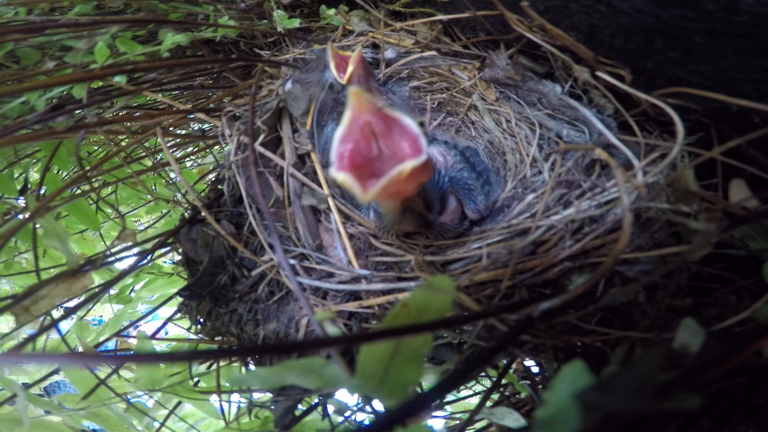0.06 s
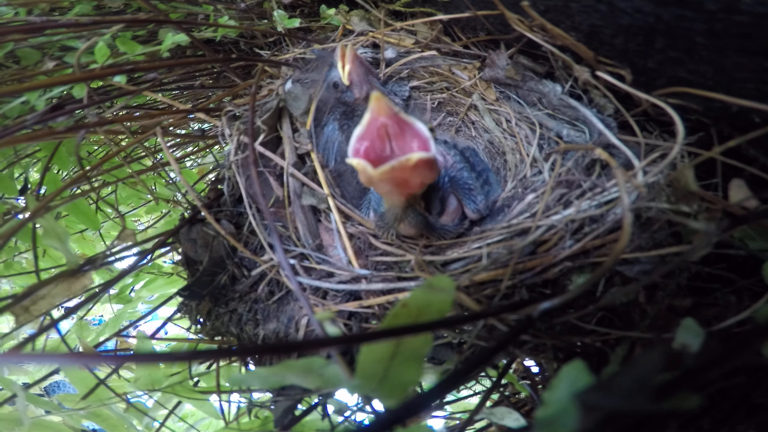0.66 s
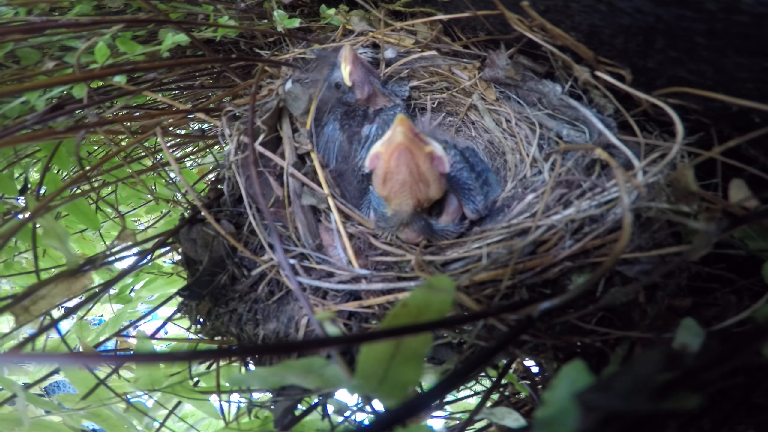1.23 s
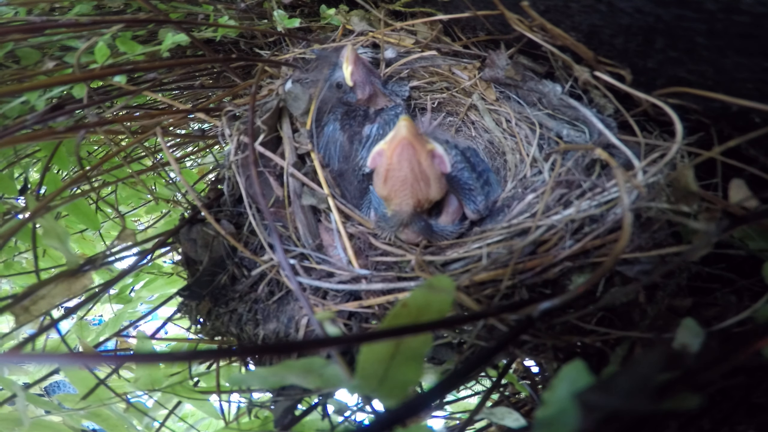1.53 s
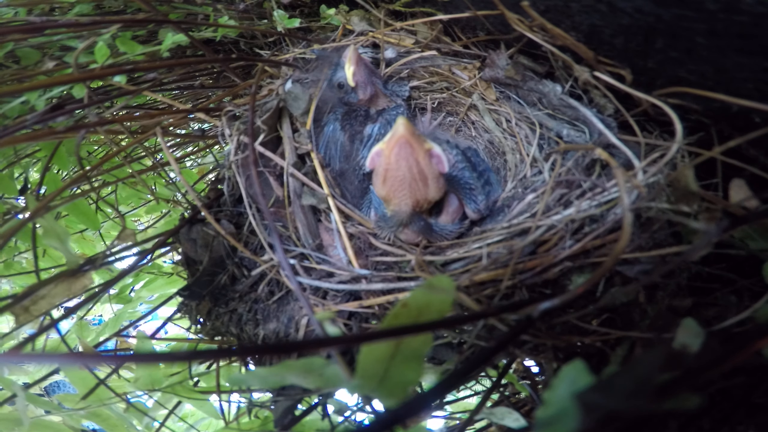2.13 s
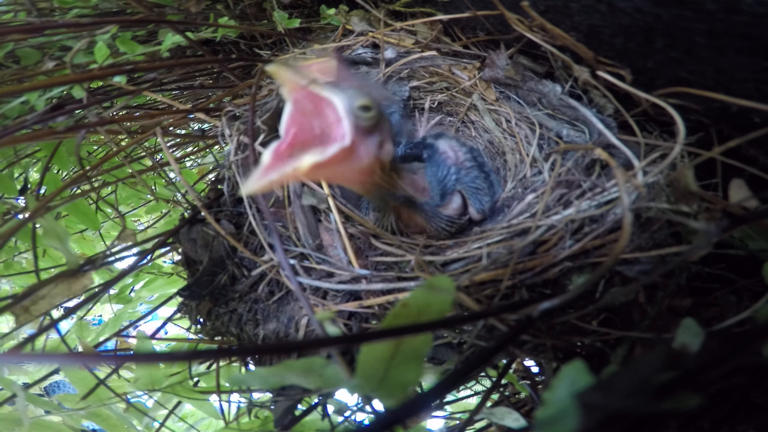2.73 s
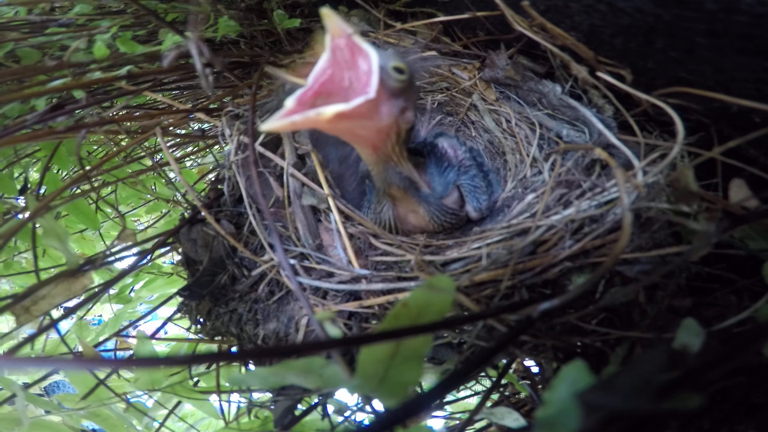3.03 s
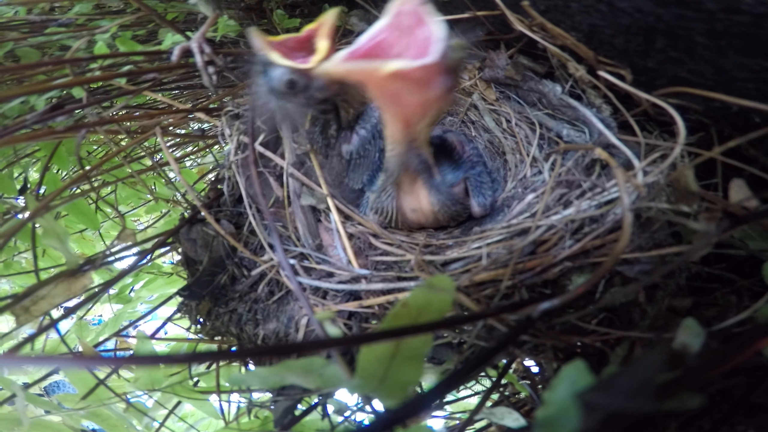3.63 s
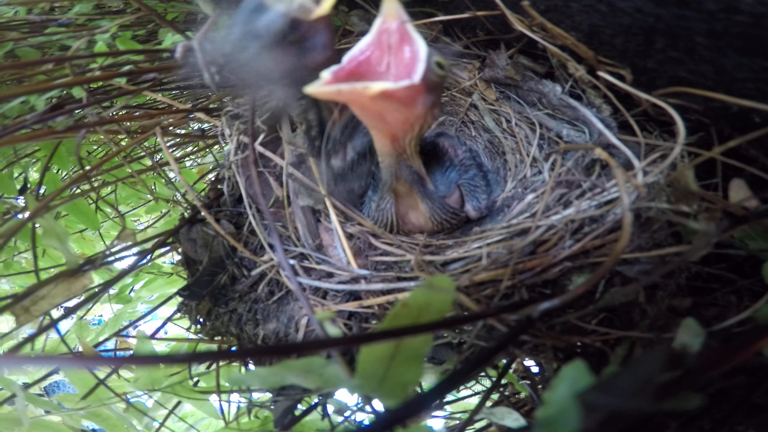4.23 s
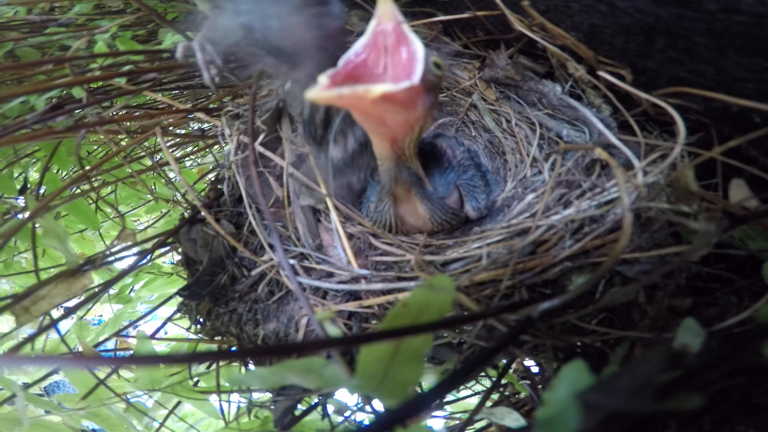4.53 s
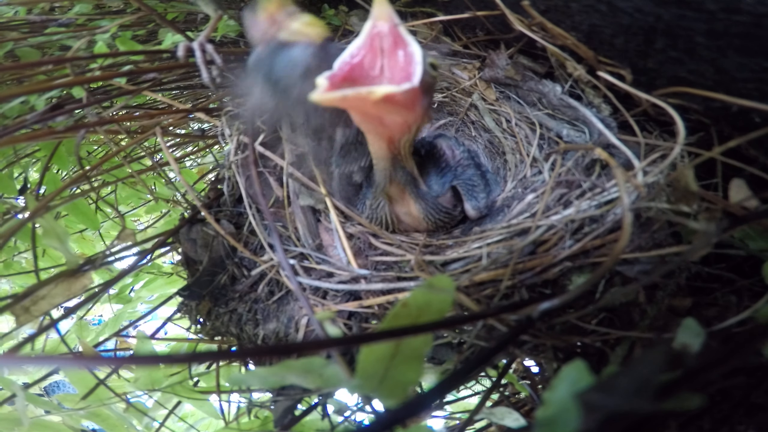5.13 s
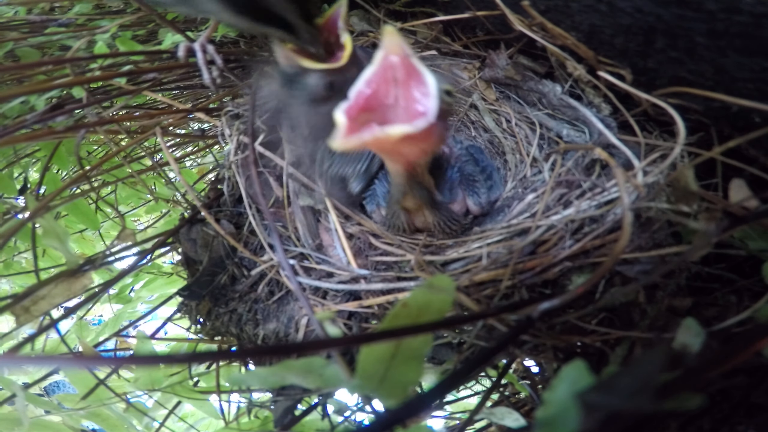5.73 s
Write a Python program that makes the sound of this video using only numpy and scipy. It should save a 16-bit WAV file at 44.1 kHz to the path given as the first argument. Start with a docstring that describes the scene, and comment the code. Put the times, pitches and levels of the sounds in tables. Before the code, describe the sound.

Nestling birds move in a garden nest, very close to the microphone. A short crackle of dry straw and twigs opens the sound and fades by 0.3 seconds. A second burst of rustling, snaps and soft bumps comes from about 1.5 to 2 seconds. The loudest crunching and knocking runs from 2.4 to 3.1 seconds. Each movement shakes the microphone with a low rumble. At about 2.8 seconds the chicks begin begging: around nine short, thin, wavering, very high peeps, two or three a second, continuing to about 6 seconds. They are much quieter than the snaps, growing a little clearer after 4.4 seconds, with faint rising trills between them. Light fidgeting and a few ticks and scrapes accompany the peeps, with one soft bump near 4.5 seconds. A faint hiss and a low electrical throb, about ten pulses a second, lie underneath throughout.

```python
"""Nestlings beg in a garden nest, close to a small camera fixed among the twigs.
Each peep is a self-sustained oscillation of the syrinx, a thin wavering whistle at 6-7 kHz, with faint
rising trills between. The chicks' lurches crush the dry lining, whose clicks and snaps excite resonances
of the twigs and camera housing, and sway the nest, which shakes the camera with a low rumble.
A faint electrical throb and hiss lie underneath."""
import sys
import numpy as np
from scipy import signal
from scipy.fft import rfft, irfft
from scipy.io import wavfile
from scipy.ndimage import uniform_filter1d

SR = 44100
rng = np.random.default_rng(int(sys.argv[2]) if len(sys.argv) > 2 else 0)


def file_out(sig):
    """Save sig as 16-bit WAV at sys.argv[1]."""
    # one column per channel
    cols = np.atleast_2d(sig).T
    # limit, then scale
    lim = np.clip(cols, -1, 1)
    pcm = np.round(lim * 32767).astype(np.int16)
    wavfile.write(sys.argv[1], SR, pcm)


N = 263277
TIME = np.arange(N) / SR
SLOW_TIME = TIME[::32]

# a chick shifts its weight (levels relative): start_s, length_s, rustle_db, sway_db
LURCHES = [(0, 0.015, -44.5, -42), (0.082, 0.045, -39.5, -26), (0.174, 0.028, -52, -39),
           (0.262, 0.056, -63, -35), (0.506, 0.017, -64, -36.5), (1.137, 0.017, -73, -38.5),
           (1.39, 0.24, -64, -37.5), (1.576, 0.041, -40, -26), (1.646, 0.018, -34, -24.5),
           (1.681, 0.047, -47.5, -27), (1.791, 0.039, -53, -36.5), (1.936, 0.011, -55.5, -37),
           (2.382, 0.054, -51, -37.5), (2.46, 0.026, -37, -41), (2.517, 0.068, -30.5, -23.5),
           (2.587, 0.048, -35, -25.5), (2.655, 0.027, -46, -29.5), (2.738, 0.011, -72, -27),
           (2.904, 0.066, -32.5, -28.5), (3.011, 0.044, -36.5, -32.5), (3.108, 0.091, -60.5, -35),
           (3.319, 0.043, -47.5, -31), (3.897, 0.018, -68, -33.5), (4.098, 0.18, -69.5, -39),
           (4.41, .03, -66, -36.5), (4.704, 0.033, -76, -37.5), (5.614, 0.042, -73, -35),
           (5.827, 0.09, -72, -39)]
# resonances of the twigs and camera housing: centre_hz, width_hz, gain_db
BODY_MODES = [(453, 330, 4.5), (898, 96, 3), (1250, 28, 4), (2020, 36, 1), (2382, 89, 4.5), (2743, 62, 1.5),
              (4000, 95, 4.5), (4450, 370, 3), (4730, 210, -0.5), (6800, 810, 9)]
# spectrum of rubbed straw: frequency_hz, gain_db
STRAW_SPECTRUM = [(80, -17), (160, 12), (300, -2.5), (700, -2.5), (1500, 1), (2600, -1.5), (3200, -10),
                  (3600, -12.5), (5200, -17.5), (6300, -29), (7800, -28), (11000, -36.5), (15000, -50)]


def peeps(waver=0.0042, flutter_db=1.4, level_db=-.5, clear_db=-52, rasp=0.27,
          attack_s=0.01, release_s=0.001):
    """Airflow sustains a nearly sinusoidal oscillation of the syrinx, rough where it is weakly blown."""
    # one peep a row (levels relative): start_s, length_s, scoop_s, climb_s, start_hz, scoop_hz, held_hz,
    # start_db, scoop_db, held_db, wobble_hz, wobbles_per_s, octave_db
    calls = [(2.83, 0.21, 0.023, .098, 6100, 5470, 6040, -60, -59, -54.5, 25.1, 14.5, -27),
             (3.194, .143, 0.0344, 0.0322, 6630, 6250, 6470, -53, -57.5, -50.5, 140, 15.8, -28),
             (3.502, 0.2, 0.019, 0.11, 6350, 6000, 6880, -57, -59.5, -46.5, 64.81, 13, -28),
             (3.869, 0.15, .048, 0.044, 6660, 5400, 6270, -60, -61.5, -62.5, 64.8, 12, -18),
             (4.379, 0.17, .034, .048, 7080, 6000, 6550, -46, -62, -50, 120.4, 11, -32),
             (4.697, .158, 0.033, 0.034, 6600, 6450, 7100, -49, -50.5, -45, 147, 13.2, -29),
             (4.978, .133, .031, 0.024, 7050, 6260, 6900, -40, -59.5, -46, 64.8, 43, -26),
             (5.448, 0.14, 0.044, 0.04, 7080, 6270, 6910, -45.5, -54, -46, 140, 27, -28),
             (5.73, 0.089, 0.031, .024, 7220, 6280, 6520, -43.5, -61, -53, 205.2, 20, -28)]
    pitch, effort_db, voiced, octave = np.zeros((4, N))
    for start, length, *shape, octave_db in calls:
        on = (TIME >= start) & (TIME < start + length)
        age = TIME[on] - start
        pitch[on], effort_db[on] = peep_gesture(age, length, *shape)
        voiced[on] = np.minimum(np.minimum(age / attack_s, (length - age) / release_s), 1)
        octave[on] = undb(octave_db)
    weakness = 1 / (1 + undb(effort_db - clear_db) ** 2)
    phase = phase_of(pitch * (1 + waver * walk(260)))
    envelope = voiced * undb(effort_db + flutter_db * walk(220) + level_db)
    envelope *= 1 + rasp * weakness * walk(800)
    return np.sqrt(2) * envelope * (np.sin(phase) + octave * np.sin(2 * phase))


def peep_gesture(age, length, scoop_s, climb_s, start_hz, scoop_hz, held_hz, start_db, scoop_db, held_db,
                 wobble_hz, wobbles_per_s, drop_hz=1140, drop_db=23, drop_s=0.011, db_per_hz=0.0211):
    """Coupled modulation: pitch and level scoop, climb, wobble, then drop as the breath gives out."""
    since_scoop = np.maximum(age - scoop_s, 0)

    def ease(share):
        return np.sin(np.pi / 2 * np.clip(share, 0, 1)) ** 2

    def contour(start, low, held):
        return start + (low - start) * ease(age / scoop_s) + (held - low) * ease(since_scoop / climb_s)

    wobble = wobble_hz * np.sin(2 * np.pi * wobbles_per_s * since_scoop)
    drop = np.exp((age - length) / drop_s)
    pitch = contour(start_hz, scoop_hz, held_hz) + wobble - drop_hz * drop
    effort_db = contour(start_db, scoop_db, held_db) + db_per_hz * wobble - drop_db * drop
    return pitch, effort_db


def undertones():
    """Biphonation: the other side of the syrinx sounds briefly as some peeps start."""
    # second-voice notes: start_s, length_s, start_hz, end_hz, level_db
    notes = [(4.701, 0.02, 5350, 5850, -68), (4.979, 0.02, 5200, 4900, -64),
             (5.450, 0.016, 5000, 5700, -66), (5.735, 0.012, 5350, 4670, -65),
             (5.746, 0.016, 4720, 5800, -69)]
    return glides(notes, pulse_hz=72.6, depth=.1, swing=.002, waver=.018, octave_db=-10.5)


def trills():
    """Deep amplitude modulation breaks a faint rising whistle into pulses, each an upward flick."""
    # rising trills: start_s, length_s, start_hz, end_hz, level_db
    notes = [(3.825, 0.085, 6500, 7150, -71), (4.098, 0.037, 6400, 6900, -66),
             (4.335, 0.054, 6900, 7700, -72), (4.62, 0.052, 6540, 7160, -74),
             (5.65, 0.096, 6500, 8000, -71), (5.845, 0.18, 6650, 8100, -71)]
    return glides(notes, pulse_hz=76, depth=.9, swing=0.032, waver=0.034, octave_db=-32)


def glides(notes, pulse_hz, depth, swing, waver, octave_db):
    """Linear sweeps, modulated in amplitude (depth) and frequency (swing) by one uneven pulse."""
    pitch, envelope = np.zeros((2, N))
    for start, length, start_hz, end_hz, db in notes:
        on = gate(start, start + length, edge_s=.003)
        pitch = np.where(on > 0, np.interp(TIME, [start, start + length], [start_hz, end_hz]), pitch)
        envelope += on * undb(db)
    pulse = phase_of(pulse_hz * (1 + 0.11 * walk(30)))
    phase = phase_of(pitch * (1 + swing * np.sin(pulse) + waver * walk(830)))
    envelope *= np.maximum(1 + depth * np.cos(pulse), 0)
    return np.sqrt(2) * envelope * (np.sin(phase) + undb(octave_db) * np.sin(2 * phase))


def rustle(grains_per_s=3600, spread_db=1.5, catch_db=3, level_db=-1, stalk_db=-7,
           splinters_per_s=120, splinter_db=-19.5, hard_db=-32):
    """Stick-slip friction: dry fibres click in clusters, stalks tick and hard pressure splinters straw."""
    pressure = lining_pressure()
    sizes = undb(spread_db * np.minimum(rng.exponential(size=N), 4))
    clicks = (rng.random(N) < grains_per_s / SR) * rng.choice([-1, 1], N) * sizes
    fibres = unit(clicks * undb(catch_db * walk(200)))
    stalks = stalk_ticks() * undb(stalk_db)
    crunch = through((fibres + stalks) * pressure, STRAW_SPECTRUM, BODY_MODES)
    # splintering straw: frequency_hz, gain_db
    splinter_spectrum = [(1500, -15), (3800, 0.5), (5200, 18.0), (8000, -13.5), (15000, -7)]
    breaks = unit((rng.random(N) < splinters_per_s / SR) * rng.standard_normal(N))
    splinters = through(breaks, splinter_spectrum, BODY_MODES)
    hardness = np.minimum(pressure / undb(hard_db), 1)
    return undb(level_db) * crunch + undb(splinter_db) * splinters * pressure * hardness


def lining_pressure(creep_db=-17):
    """Loading and creep: each lurch presses the lining fast; straw creeps before and settles after."""
    levels = []
    for start, length, db, _ in LURCHES:
        press = swell_db(start, length, attack_s=0.0076, release_s=0.016)
        creep = creep_db + swell_db(start, length, attack_s=0.076, release_s=0.15)
        levels.append(db + np.maximum(press, creep))
    return np.interp(TIME, SLOW_TIME, undb(np.max(levels, axis=0)))


def stalk_ticks(per_s=380, spread_db=2.5, decay_cycles=3.8, low_hz=400, high_hz=3300, size=512):
    """Damped free vibration: stalks ring at random times, each at its own natural frequency; rms 1."""
    out, t = np.zeros(N + size), np.arange(size) / SR
    for when, pitch, force in rng.random((int(per_s * N / SR), 3)):
        hz = low_hz * (high_hz / low_hz) ** pitch
        gain = hz * undb(spread_db * min(-np.log(1 - force), 3))  # thin stalks ring briefly but sharply
        at = int(when * N)
        out[at:at + size] += gain * np.exp(-t * hz / decay_cycles) * np.sin(2 * np.pi * hz * t)
    return unit(out[:N])


def snaps(rise_s=0.0002, decay_s=0.0031, dulling_db_per_octave=18, ring_db=8, ring_width_hz=300,
          level_db=-2.5, size=2048):
    """Brittle fracture: a stalk gives way in a short burst that rings it, the twigs and the housing."""
    # stalks snapping or slipping (levels relative): start_s, peak_db, top_hz, bass_db, ring_hz
    fractures = [(0.077, -33.5, 7000, -4, 1410), (0.088, -29.5, 4850, -11, 1950),
                 (0.098, -30, 5300, -24, 2230), (0.122, -31, 3200, -18, 2330),
                 (0.156, -37.5, 2480, -10, 1600), (0.196, -31.5, 2320, -11, 1230),
                 (0.46, -48.5, 3300, -4, 1480), (0.514, -49.5, 3800, -8, 2500),
                 (1.566, -37, 3700, -15, 2190), (1.585, -23.5, 4230, -4.5, 1700),
                 (1.63, -33, 5000, -4, 1310), (1.64, -34, 4600, -10, 1900), (1.652, -37, 3000, -1, 1160),
                 (1.66, -26.5, 6600, 5, 1140), (1.777, -36, 2100, 1.5, 1210),
                 (1.791, -38.5, 3000, -9, 1940), (1.814, -40, 3300, -8, 2370),
                 (1.93, -39.5, 8000, -15, 2360), (1.942, -37, 2900, -1, 1690),
                 (2.352, -41, 4430, 2.5, 2300), (2.408, -30, 2240, -7, 1670),
                 (2.459, -28.5, 3020, -1, 2180), (2.523, -17, 4780, -9, 2150),
                 (2.573, -12.5, 4470, -34, 2060), (2.609, -25.5, 3400, -42, 1670),
                 (2.629, -22.5, 4540, -18, 1990), (2.897, -23.5, 2100, -4.5, 1690),
                 (2.935, -17, 3300, -19, 2200), (2.971, -22, 2400, -19, 1940),
                 (3.004, -18, 9000, -14, 2510), (3.086, -38.5, 3100, -5, 2720),
                 (3.108, -41.5, 3400, 7, 1620), (3.318, -42.5, 4000, -9, 1440),
                 (3.336, -36, 2300, -27, 1800), (4.606, -49.5, 4600, -13, 2340),
                 (4.856, -37.5, 2380, -7, 2360)]
    # spectrum common to all snaps: frequency_hz, gain_db
    snap_spectrum = [(100, -13.5), (400, -6.5), (800, 3.5), (1500, -4), (2400, 0.5), (3300, -8),
                     (5200, -8.5), (6500, -21.5), (8000, -26.5), (15000, -33.5)]
    # brightness of a clean break, which a softer one loses above its top_hz: frequency_hz, gain_db
    clean_break = [(1500, 0), (2800, 0.5), (4500, -1), (7000, 4.5), (11000, 16), (15000, 21)]
    out, t = np.zeros(N + size), np.arange(size) / SR
    body = response(snap_spectrum, BODY_MODES)[:size]
    envelope = (1 - np.exp(-t / rise_s)) ** 2 * np.exp(-t / decay_s)
    for start, peak_db, top_hz, bass_db, ring_hz in fractures:
        # the fibres tear one after another, each about as hard as the last
        burst = np.sign(rng.standard_normal(size)) * envelope
        treble = [(hz, db - dulling_db_per_octave * max(np.log2(hz / top_hz), 0))
                  for hz, db in clean_break]
        stalk = response([(700, bass_db)] + treble, [(ring_hz, ring_width_hz, ring_db)], size=512)
        crack = signal.fftconvolve(signal.fftconvolve(burst, body), stalk)[:size]
        peak = np.sqrt(uniform_filter1d(crack ** 2, size=88).max())  # rms of the loudest 2 ms
        at = int(start * SR)
        out[at:at + size] += crack / peak * undb(peak_db + level_db)
    return out[:N]


def scrapes(ring_width_hz=260, dull_hz=3200):
    """Friction noise swells and fades, coloured by the resonance of one brushed stalk."""
    # brushes against a stalk: middle_s, half_length_s, level_db, ring_hz, ring_db
    strokes = [(0.248, 0.0037, -42, 2500, 16.5), (1.524, 0.0035, -44, 2360, 19),
               (3.909, 0.0059, -45.5, 1420, -11), (4.862, 0.0055, -42, 2370, 7),
               (5.05, 0.028, -56.5, 620, 17.5), (5.35, 0.038, -61.5, 1290, 0)]
    out = np.zeros(N)
    for middle, half_length, db, ring_hz, ring_db in strokes:
        friction = through(rng.standard_normal(N), STRAW_SPECTRUM, [(ring_hz, ring_width_hz, ring_db)])
        swell = undb(db) / (1 + ((TIME - middle) / half_length) ** 2)
        out += unit(butter(friction, dull_hz, "lowpass")) * swell
    return out


def bumps(decay_s=0.0056):
    """A heavily damped oscillator: the woven wall answers a knock with a few low cycles."""
    # knocks of a body against the nest wall: start_s, level_db, pitch_hz
    knocks = [(1.591, -26, 184), (1.95, -27.5, 121), (2.471, -22, 130), (2.575, -18.5, 443),
              (2.63, -23.5, 187), (2.903, -29.5, 223), (3.039, -31, 173), (3.9, -60, 156),
              (4.47, -32.5, 189)]
    out = np.zeros(N)
    for start, db, hz in knocks:
        age = np.maximum(TIME - start, 0)
        out += undb(db) * np.exp(-age / decay_s) * np.sin(2 * np.pi * hz * age)
    return out


def fidgets(level_db=-73, begging_db=4.5, uneven_db=4.0):
    """Light friction of down on straw, a little louder once the chicks stretch up to beg."""
    brushing = rng.standard_normal(N) * undb(uneven_db * walk(45))
    begging = gate(3.9, TIME[-1], edge_s=0.64)
    return through(brushing, STRAW_SPECTRUM, BODY_MODES) * undb(level_db + begging_db * begging)


def rumble(level_db=-1, rest_db=-46, begging_db=-43, begging_from_s=3.5):
    """Structure-borne sound: the nest's sway, greatest at lurches, reaches the microphone by its mount."""
    # vibration of the mount: frequency_hz, gain_db
    mount_spectrum = [(8, -29.5), (20, 7), (30, 3), (50, 0.5), (85, -6), (115, -17), (180, -22), (260, -39),
                      (400, -34.5), (800, -73.5)]
    sway_db = np.where(SLOW_TIME < begging_from_s, rest_db, begging_db)
    for start, length, _, db in LURCHES:
        sway_db = np.maximum(sway_db, db + swell_db(start, length, attack_s=0.037, release_s=0.052))
    shake = through(rng.standard_normal(N), mount_spectrum)
    shake /= np.sqrt(uniform_filter1d(shake ** 2, size=4000) + 1e-9)  # even, so the sway sets the level
    return shake * np.interp(TIME, SLOW_TIME, undb(sway_db + level_db))


def throb(period_s=.1024, start_s=.0136, width_s=0.0016, supply_hz=55, coupling_hz=27, peak_db=-34.5):
    """Electrical coupling: periodic dips of the camera's supply leak into the sound as soft thuds."""
    dips = np.clip((width_s - (TIME - start_s) % period_s) * SR, 0, 1)
    smoothed = butter(dips, supply_hz, "lowpass", order=1)
    thuds = butter(smoothed, coupling_hz, "highpass", order=3)
    return -undb(peak_db) * thuds / thuds.max()


def hiss(level_db=-61.0, flicker_db=1.0):
    """The noise floor: broadband garden air and microphone hiss, flickering slightly in level."""
    # air and microphone noise: frequency_hz, gain_db
    floor_spectrum = [(60, -5.5), (200, 4), (400, -5), (700, -6), (1500, -10), (2600, -13), (3200, -12),
                      (4800, -14.5), (6200, -12), (7400, -19), (10000, -20.5), (15000, -25)]
    envelope = undb(level_db + flicker_db * walk(16))
    return envelope * through(rng.standard_normal(N), floor_spectrum, BODY_MODES[:6])


def undb(db):
    """Decibels to amplitude gain."""
    return 10 ** (np.asarray(db) / 20)


def unit(x):
    """Normalisation to rms 1."""
    return x / np.sqrt(np.mean(x ** 2) + 1e-18)


def walk(per_s):
    """Linear interpolation of random values: a smooth wander of rms 1."""
    size = max(int(SR / per_s), 2)
    steps = np.repeat(rng.standard_normal(N // size + 1), size)[:N]
    return unit(uniform_filter1d(steps, size))


def gate(start, end, edge_s):
    """Trapezoidal window: 1 between two times, with sloping edges outside them."""
    return np.clip(np.minimum(TIME - start, end - TIME) / edge_s + 1, 0, 1)


def swell_db(start, length, attack_s, release_s):
    """Exponential rise to a start time, hold and exponential release, in dB along SLOW_TIME."""
    away = np.maximum((start - SLOW_TIME) / attack_s, (SLOW_TIME - start - length) / release_s)
    return -20 / np.log(10) * np.maximum(away, 0)


def phase_of(hz):
    """Phase as the time integral of frequency."""
    return 2 * np.pi * np.cumsum(hz) / SR


def response(spectrum, resonances=(), size=8192):
    """Minimum-phase impulse response, of unit energy, of a spectrum with Lorentzian resonances."""
    hz = np.maximum(np.arange(size // 2 + 1) * SR / size, 1)
    points, db = np.transpose(spectrum)
    db = np.interp(np.log(hz), np.log(points), db)
    for centre, width, gain_db in resonances:
        db = db + gain_db / (1 + (2 * (hz - centre) / width) ** 2)
    cepstrum = irfft(np.log(undb(db)))
    cepstrum[1:size // 2] *= 2  # folding onto positive time makes the response causal
    cepstrum[size // 2 + 1:] = 0
    ring = irfft(np.exp(rfft(cepstrum)))
    return ring / np.linalg.norm(ring)


def through(x, spectrum, resonances=()):
    """Linear filtering: convolution with the response of a spectrum and its resonances."""
    return signal.fftconvolve(x, response(spectrum, resonances))[:len(x)]


def butter(x, hz, kind, order=2):
    """Maximally flat low-pass or high-pass."""
    return signal.sosfilt(signal.butter(order, hz, kind, fs=SR, output="sos"), x)


def scene():
    """Superposition of chicks, nest and camera noise at one microphone."""
    chicks = undertones() + trills() + peeps()
    nest = rustle() + snaps() + scrapes() + bumps() + fidgets() + rumble()
    return (chicks + nest + throb() + hiss())[None]


def record(dry, ceiling=0.76, top_hz=15300):
    """Soft saturation and band limiting: the camera rounds off the loudest snaps and cuts the top."""
    rounded = dry / (1 + (dry / ceiling) ** 4) ** (1 / 4)
    return signal.sosfilt(signal.ellip(10, .2, 80, top_hz, fs=SR, output="sos"), rounded)


dry = scene()
out = record(dry)
file_out(out)
```